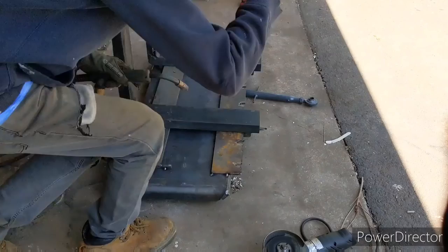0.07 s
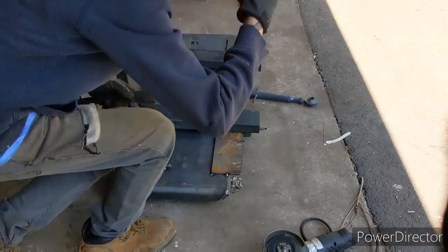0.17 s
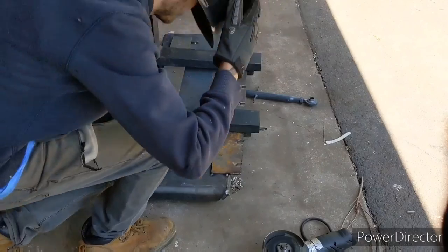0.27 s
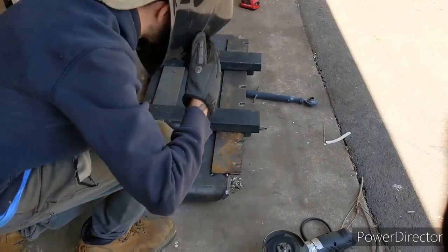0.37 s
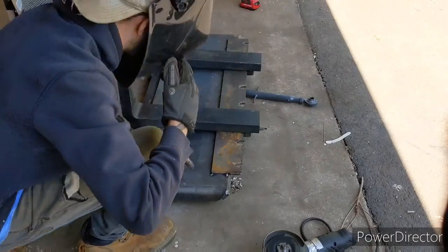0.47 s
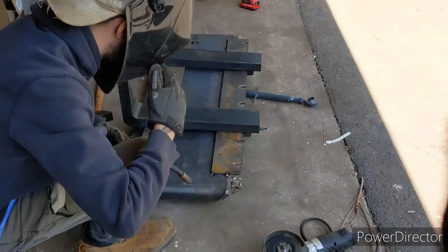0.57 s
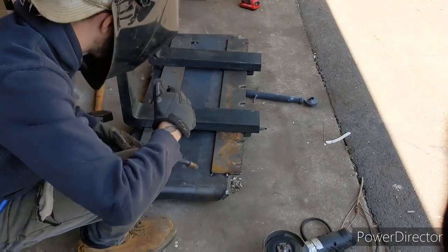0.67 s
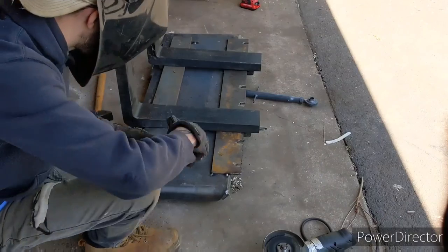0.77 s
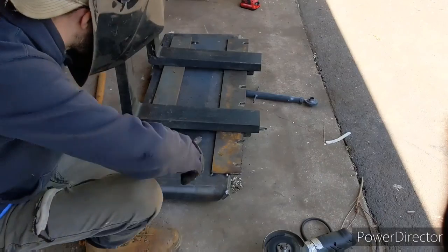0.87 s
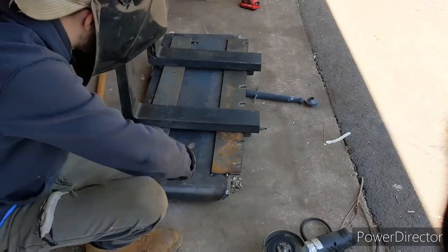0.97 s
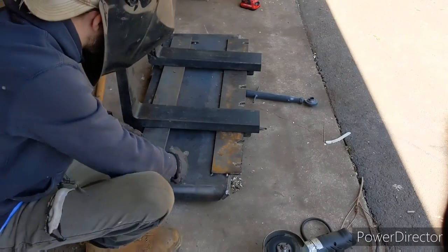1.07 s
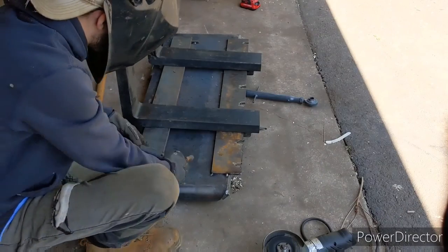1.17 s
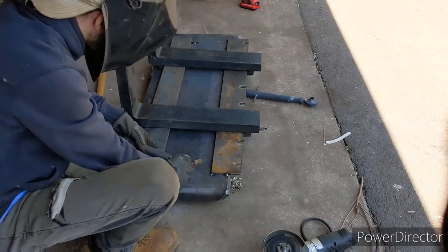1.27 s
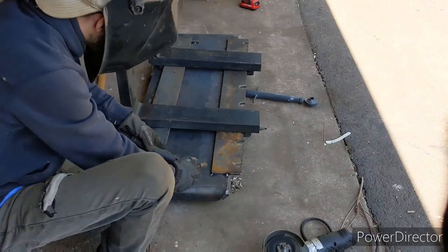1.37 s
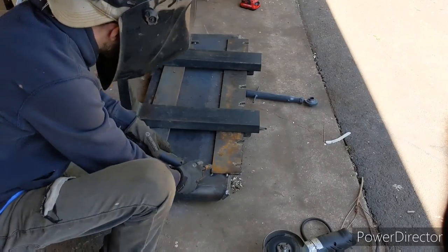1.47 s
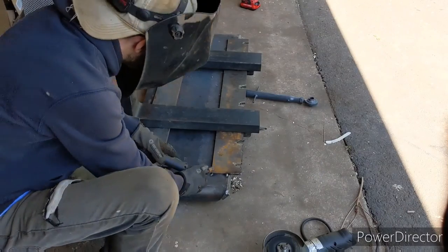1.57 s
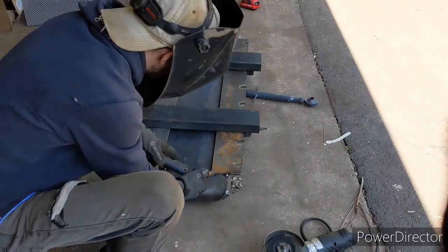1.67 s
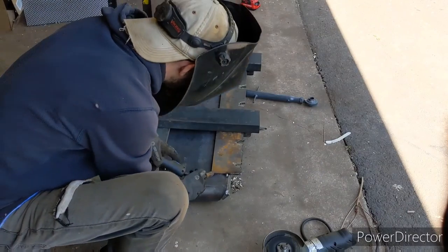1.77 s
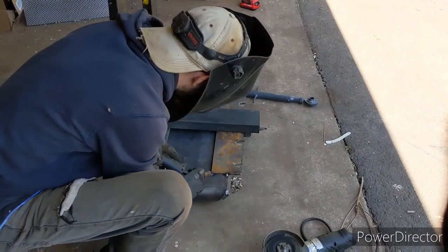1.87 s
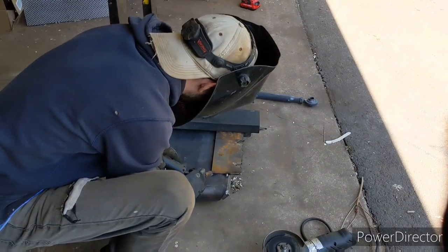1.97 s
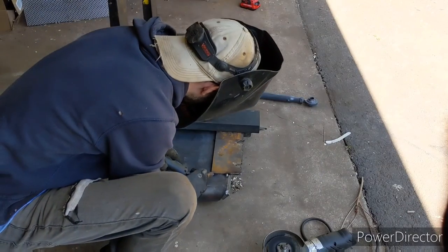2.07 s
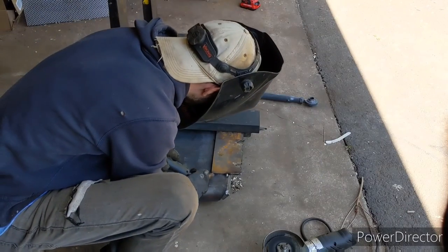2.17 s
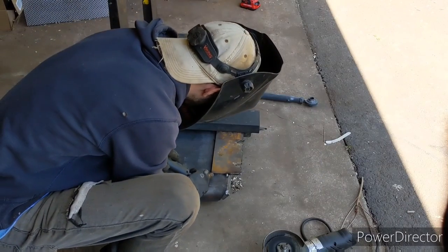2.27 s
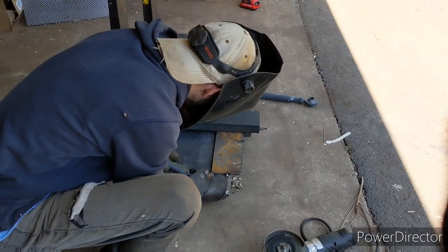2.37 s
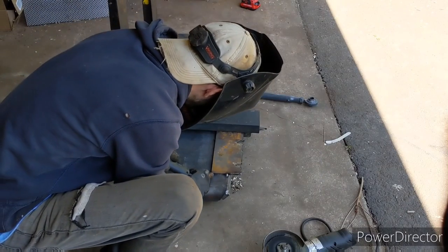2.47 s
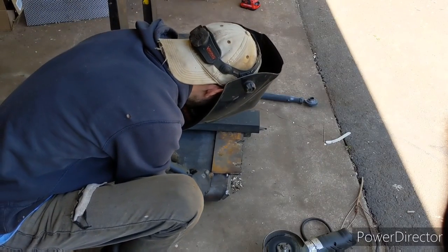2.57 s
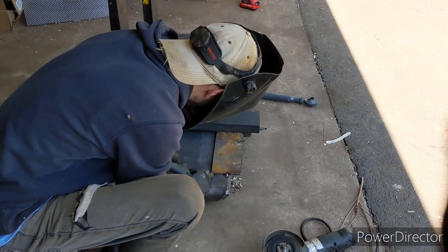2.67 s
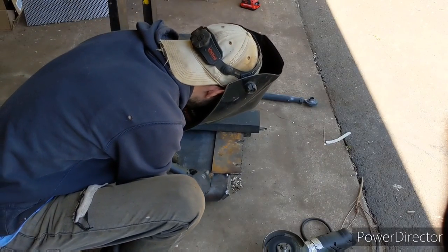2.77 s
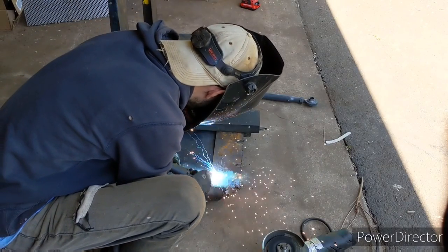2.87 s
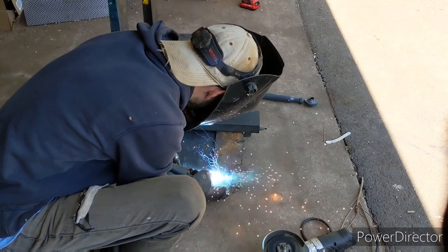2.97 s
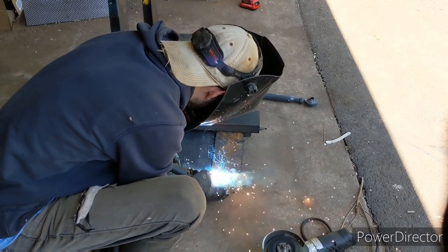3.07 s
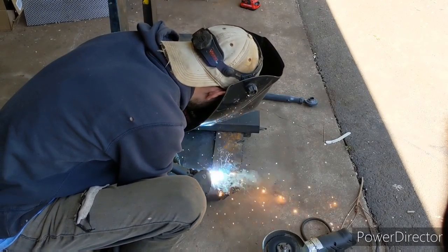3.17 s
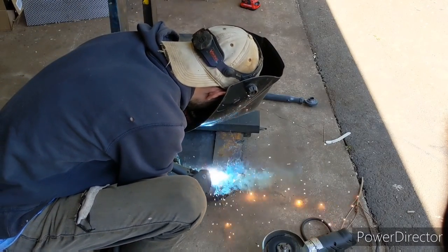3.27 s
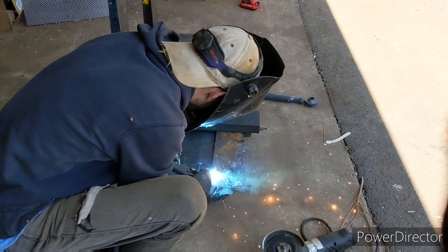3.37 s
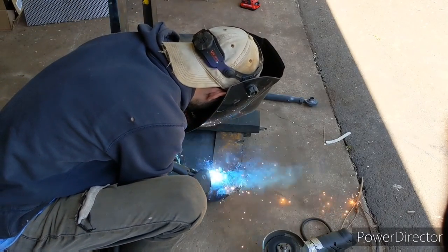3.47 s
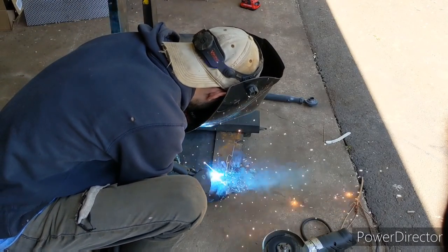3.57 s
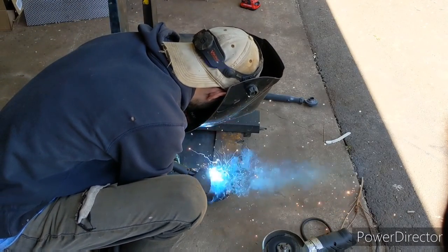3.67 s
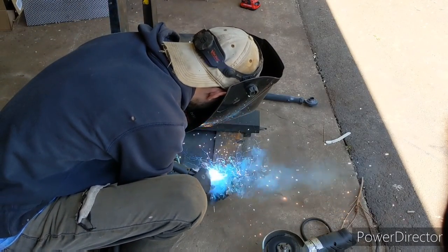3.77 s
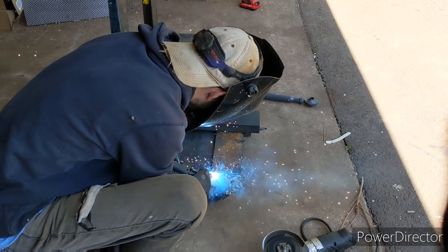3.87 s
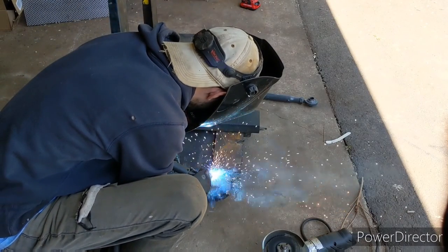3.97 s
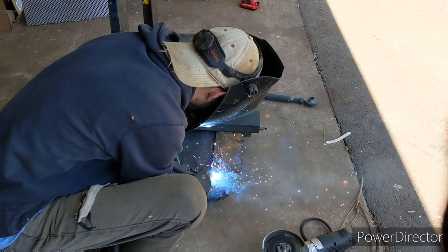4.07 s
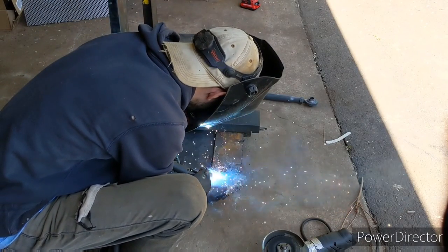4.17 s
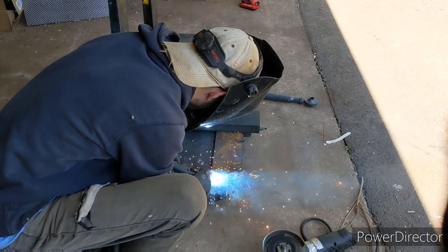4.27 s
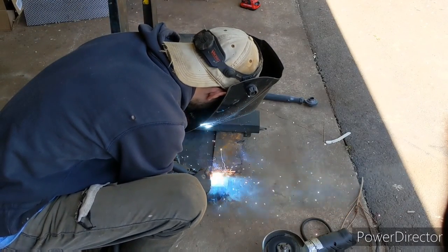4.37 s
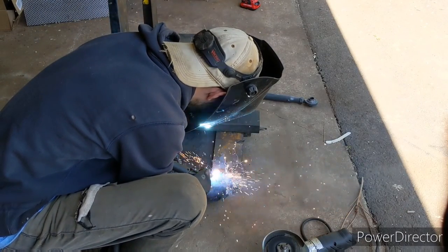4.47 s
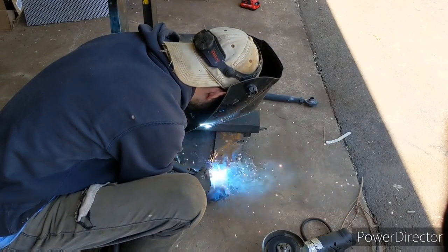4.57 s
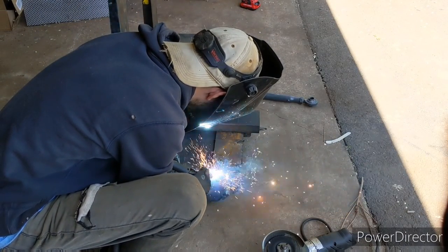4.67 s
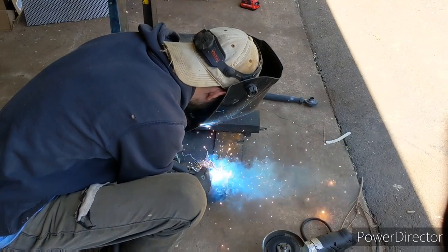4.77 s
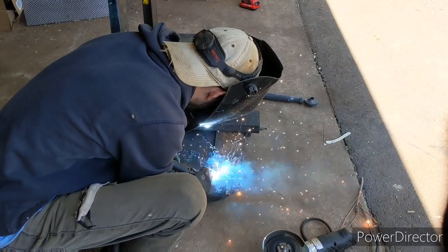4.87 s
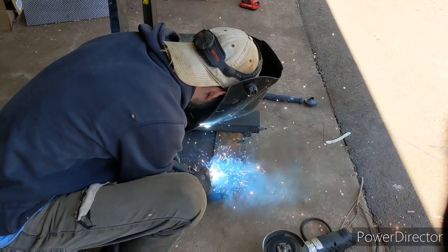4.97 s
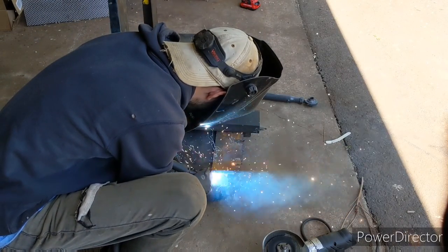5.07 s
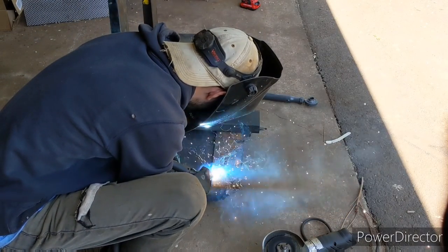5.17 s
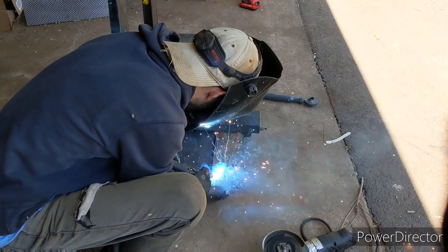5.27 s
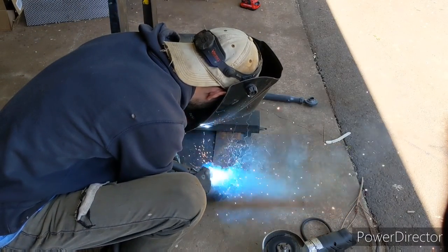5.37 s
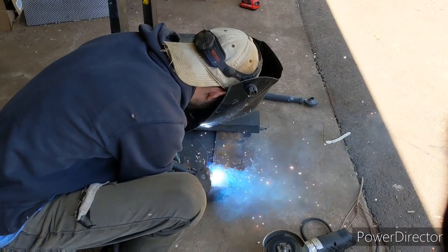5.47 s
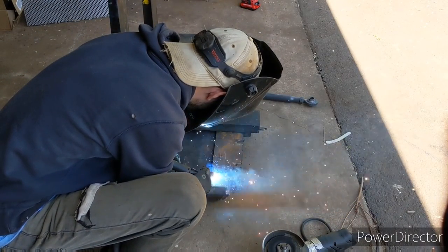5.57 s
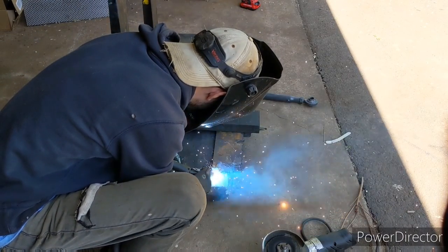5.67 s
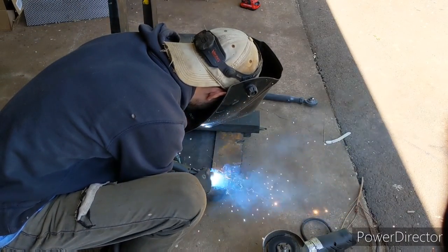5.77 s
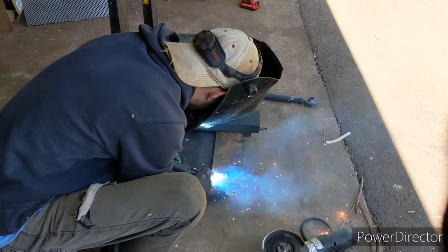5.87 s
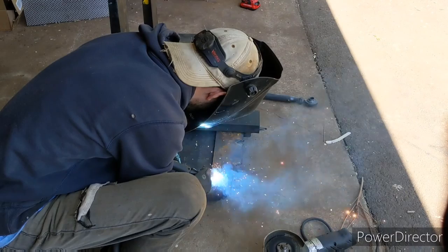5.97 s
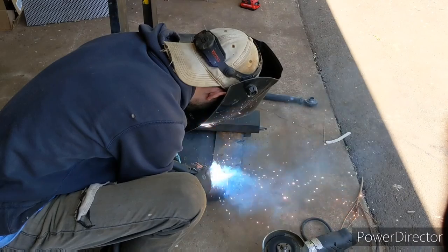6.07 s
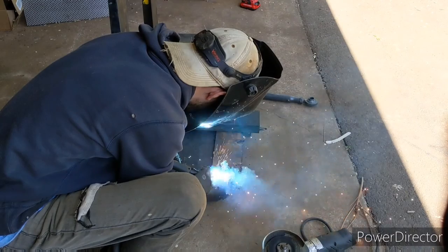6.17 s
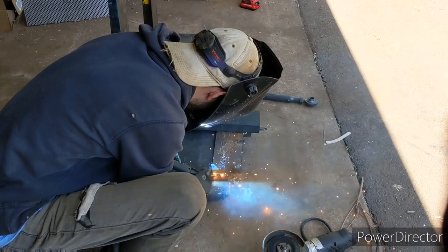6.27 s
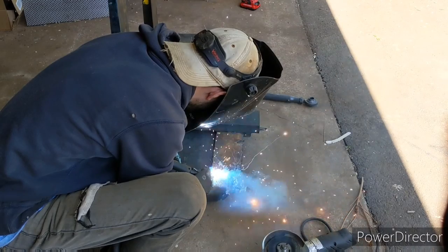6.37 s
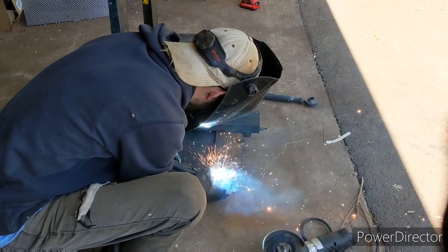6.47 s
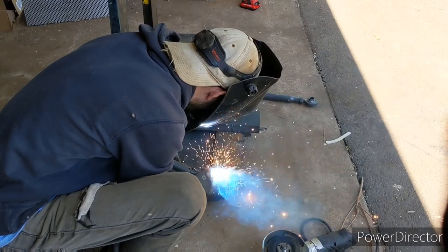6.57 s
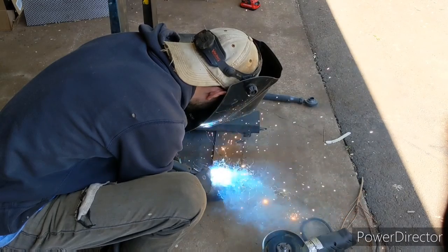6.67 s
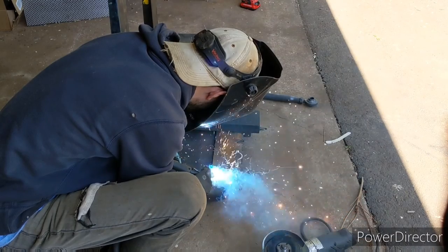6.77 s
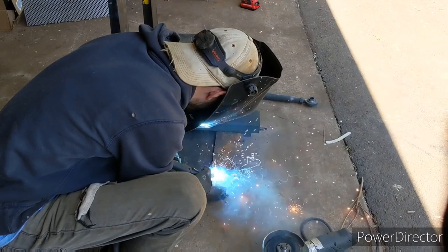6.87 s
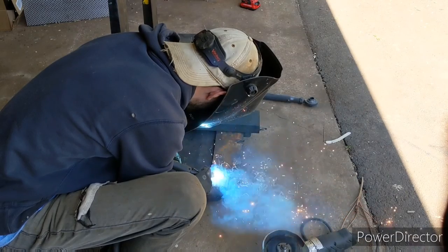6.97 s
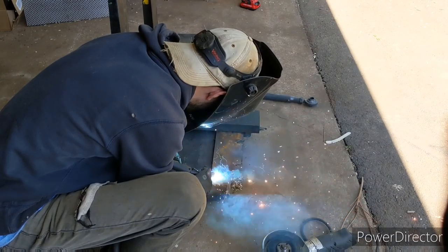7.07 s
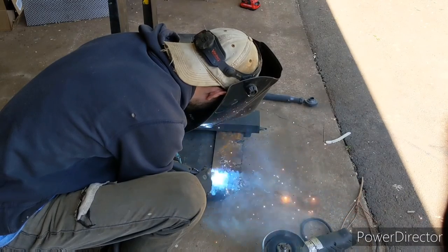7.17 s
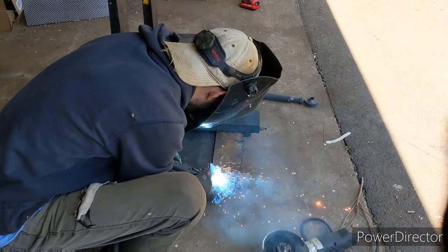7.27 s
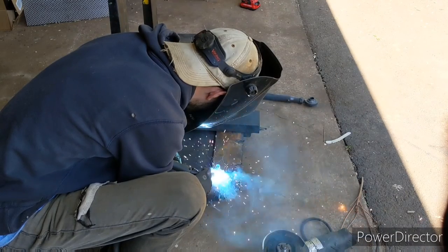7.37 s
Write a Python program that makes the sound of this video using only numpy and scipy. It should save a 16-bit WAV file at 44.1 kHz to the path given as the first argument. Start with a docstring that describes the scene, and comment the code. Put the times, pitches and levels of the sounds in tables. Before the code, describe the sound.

Quiet welder fan drone with a short glove scrape, then a puff of gas and harsh, dense electric arc crackling with thumping microphone overloads.

```python
"""A low outdoor murmur with one tick drops into a short silence; then a welder's fan hums in an open workshop doorway.
A glove scuffs on steel, shielding gas whistles on, and a wire-feed arc burns.
Fan: sine tones and shaped noise; glove and gas: filtered noise; arc: hiss with spikes filtered into cracks.
Droplets short the arc and crack; some of the louder cracks overload one or both microphones of the pair, which thump."""
import sys
import numpy as np
from scipy import signal
from scipy.fft import rfft, irfft
from scipy.io import wavfile
from scipy.ndimage import uniform_filter1d

SR = 44100
rng = np.random.default_rng(int(sys.argv[2]) if len(sys.argv) > 2 else 0)


def dump_mix(stems):
    """Bounce the given channels to the path in sys.argv[1] as a 16-bit WAV at rate SR."""
    frames = np.atleast_2d(stems).T  # one column per channel
    limited = np.clip(frames, -1, 1)  # hard clip at full scale
    pcm = np.round(limited * 32767).astype(np.int16)
    wavfile.write(sys.argv[1], SR, pcm)


N = 327663

# quiet outdoor murmur before a short silence: start_s, level_db
MURMUR = [(0, -52), (.03, -52), (.05, -52), (.088, -55), (.094, -110)]
TICK_S, TICK_DB = .0272, -9.5  # level of the spike before its band filter

# fan, heard lower while the arc burns: start_s, blade_hz, level_db (gain on all steady workshop sound)
FAN = [(0.128, 212, -42), (0.132, 211.6, 2), (2.9, 211.5, 1.5), (3.03, 210.5, -3.5), (5, 208.4, -5),
       (7.43, 209.5, -4.5)]
# blade tone harmonics: multiple of blade_hz, level_db (rms before the fan gain)
BLADE = [(1, -37), (2, -56), (3, -82)]
# steady motor lines: pitch_hz, level_db (rms before the fan gain)
MOTOR = [(89, -53.5), (811, -63), (990, -65), (1081, -66)]
# spectrum of the fan's rushing air: frequency_hz, density_db (per Hz, relative)
AIR = [(20, -18), (40, -14.5), (70, -15), (120, -19), (175, -6.5), (230, -11.5), (255, -22.5), (335, -21.5),
       (375, -16.5), (460, -16), (650, -20.5), (1050, -21), (1350, -26), (1900, -25.5), (2500, -32),
       (4000, -35.5), (7300, -46), (9000, -43), (14400, -53.5), (16000, -81)]
AIR_DB = -44  # rms before the fan gain and flutter
AIR_ALIKE_HZ = 664  # below this both microphones share much of the air

# shielding gas starts: start_s, level_db
GAS = [(2.808, -72), (2.815, -29.5), (2.82, -30), (2.85, -35.5), (2.9, -42.5), (2.93, -61)]
# spectrum of gas through the nozzle: frequency_hz, density_db (per Hz, relative)
NOZZLE = [(530, -37), (900, -13), (1500, -11), (2390, -1), (2900, -9), (4150, -5.5), (4870, -18),
          (6700, -10), (7600, -16), (9310, -1), (13800, -8), (16000, -11)]

# glove on steel: start_s, level_db, bright_share (0-1)
SCUFF = [(0.83, -73, .5), (0.862, -46, 0.24), (0.9, -79, 0.3), (1.43, -61, 0.3), (1.45, -48, 0.3),
         (1.472, -43, 0.5), (1.478, -38, 0.47), (1.497, -42, 0.6), (1.501, -31, 0.33), (1.52, -31.5, 0.2),
         (1.533, -40, 0.3), (1.6, -60, 0.24)]
# plate ring under the glove: centre_hz, width_hz, level_db
PLATE = [(131, 83, 3.5), (1870, 170, 4.5), (2240, 600, 3), (3100, 350, -1), (4500, 2600, -2)]

# arc hiss while it burns: start_s, level_db (before colouring)
ARC = [(2.9, -79), (2.912, -24.5), (2.95, -22.5), (3.03, -24), (3.065, -14.5), (3.08, -20), (3.19, -17.5),
       (3.3, -22.5), (3.68, -22), (4.25, -20), (4.5, -24.5), (4.64, -19.5), (5.0, -21), (5.42, -18.5),
       (5.68, -22), (6.08, -24), (6.15, -18.5), (6.33, -25.5), (6.43, -20), (6.58, -24.5), (6.9, -19),
       (7.05, -23), (7.13, -26.5), (7.24, -23), (7.3, -26), (7.43, -22.5)]
# spectrum of the hiss: frequency_hz, density_db (per Hz, relative)
HISS = [(150, -6.5), (300, -14), (600, -7), (900, -9.5), (1380, -4.5), (1900, -8), (2750, -3), (6500, -1),
        (7300, -5), (9000, -2.5), (10100, 3), (13000, -1), (16000, -2.5)]
# level of the lower hiss: start_s, level_db
ROAR = [(4.36, -2), (4.43, -3), (4.55, 0), (5.6, -0.5), (7.0, -1.5), (7.15, -6)]
ROAR_HZ, ROAR_WANDER_DB = 4130, 2.5  # below this the hiss swells and sinks on its own
WANDER_DB = 4.5  # the arc drifts left and right
HISS_ALIKE = .42  # share of hiss power common to both microphones
# the arc goes out: start_s, gap_ms (until it strikes again)
OUTAGES = [(2.955, 52), (3.482, 19), (5.842, 4.4), (5.9, 14), (6.105, 5.9), (6.227, 49), (7.137, 54),
           (7.196, 12), (7.275, 20), (7.312, 11), (7.338, 8.6), (7.389, 11)]
OUT_DROP_DB, OUT_FADE_DB_PER_S, RESTRIKE_MS = -3.5, -140, 27

# loud cracks: start_s, body_db, treble_db (nominal peaks)
CRACKS = [(2.9121, -27, -19), (2.918, -23.0, -16.0), (2.9215, -20.0, -13.0), (2.9327, -20.0, -16.0),
          (2.9395, -22.0, -15.0), (2.946, -25, -16), (2.9498, -23.0, -15.0), (3.0177, -22.0, -14.0),
          (3.0269, -16.0, -14.0), (3.0422, -16.0, -13.0), (3.0536, -15.0, -14.0), (3.1173, -20.0, -16.0),
          (3.1285, -19.0, -13.0), (3.1554, -18.0, -11.0), (3.16, -18.0, -15.0), (3.1922, -18.0, -11.0),
          (3.2402, -19.0, -16.0), (3.2501, -21.0, -12.0), (3.2907, -23.0, -14.0), (3.3325, -19.0, -13.0),
          (3.3372, -20.0, -15.0), (3.3505, -19.0, -16.0), (3.382, -21, -11), (3.4459, -20.0, -16.0),
          (3.5153, -12.0, -20.0), (3.5239, -19.0, -17.0), (3.5548, -18.0, -14.0), (3.5977, -19.0, -13.0),
          (3.6148, -21, -13), (3.6579, -21.0, -13.0), (3.6846, -19.0, -14.0), (3.7048, -20.0, -15.0),
          (3.7227, -20.0, -14.0), (3.7404, -18.0, -14.0), (3.7972, -21.0, -17.0), (3.8191, -19.0, -13.0),
          (3.8512, -19.0, -14.0), (3.8594, -20.0, -17.0), (3.8757, -22, -13), (3.8963, -18.0, -14.0),
          (3.9269, -19.0, -15.0), (3.9317, -21.0, -18.0), (3.9664, -20.0, -14.0), (3.9883, -19.0, -14.0),
          (4.0263, -18.0, -13.0), (4.0528, -16.0, -14.0), (4.0598, -22, -12), (4.073, -20, -12),
          (4.0911, -18, -13), (4.1243, -17.0, -14.0), (4.1516, -19.0, -17.0), (4.1602, -19.0, -14.0),
          (4.2156, -19.0, -13.0), (4.2252, -19.0, -13.0), (4.2404, -20, -13), (4.2576, -19.0, -16.0),
          (4.2761, -19.0, -12.0), (4.3134, -19.0, -14.0), (4.3226, -22, -12), (4.365, -20.0, -16.0),
          (4.3735, -20.0, -18.0), (4.3846, -24, -12), (4.3903, -25, -13), (4.399, -23, -13),
          (4.4646, -23.0, -17.0), (4.4833, -22.0, -15.0), (4.5252, -26.0, -13.0), (4.5416, -19.0, -11.0),
          (4.5678, -21, -13), (4.5985, -19.0, -13.0), (4.623, -15.0, -15.0), (4.6507, -20, -12),
          (4.6674, -23, -12), (4.7155, -19.0, -14.0), (4.7251, -20.0, -14.0), (4.7472, -19, -13.0),
          (4.8361, -20.0, -14.0), (4.8473, -20.0, -16.0), (4.8763, -18.0, -16.0), (4.9084, -16.0, -12.0),
          (4.9278, -21, -12), (4.9511, -21, -12), (4.9978, -18.0, -13.0), (5.0249, -20.0, -13.0),
          (5.0343, -19.0, -14.0), (5.0427, -23, -13), (5.0732, -17.0, -13.0), (5.1202, -19.0, -14.0),
          (5.1567, -16.0, -13.0), (5.1859, -21, -12), (5.1939, -24, -13), (5.2207, -17.0, -17.0),
          (5.2501, -15.0, -14.0), (5.2735, -21.0, -17.0), (5.299, -19.0, -16.0), (5.3235, -18.0, -18.0),
          (5.3506, -17.0, -14.0), (5.3955, -18.0, -11.0), (5.4403, -18.0, -18.0), (5.4495, -17.0, -14.0),
          (5.484, -19.0, -13.0), (5.5067, -18.0, -15.0), (5.5171, -17.0, -13.0), (5.5255, -19.0, -13.0),
          (5.5338, -20.0, -13.0), (5.5493, -17.0, -15.0), (5.5628, -17.0, -15.0), (5.6054, -20.0, -15.0),
          (5.6166, -18.0, -13.0), (5.6381, -23.0, -16.0), (5.6574, -18.0, -13.0), (5.7335, -20.0, -13.0),
          (5.7629, -21, -13), (5.8112, -18.0, -16.0), (5.8256, -19.0, -15.0), (5.8596, -20.0, -14.0),
          (5.8748, -19.0, -16.0), (5.8906, -20.0, -17.0), (5.9226, -34, -13), (5.9494, -19.0, -18.0),
          (5.9723, -17.0, -14.0), (5.9887, -19.0, -16.0), (6.0076, -19.0, -16.0), (6.0341, -20.0, -15.0),
          (6.0636, -20.0, -17.0), (6.0909, -19.0, -19.0), (6.1002, -18.0, -18.0), (6.1372, -18.0, -11.0),
          (6.1567, -22, -13), (6.183, -20.0, -14.0), (6.1917, -20.0, -17.0), (6.2123, -21.0, -15.0),
          (6.2253, -6, -19.0), (6.2408, -18.0, -23.0), (6.2562, -17, -18), (6.2568, -15.0, -16.0),
          (6.284, -16.0, -19.0), (6.3011, -14.0, -19.0), (6.322, -17.0, -15.0), (6.3395, -17.0, -17.0),
          (6.3586, -23.0, -17.0), (6.3894, -20.0, -14.0), (6.401, -16.0, -17.0), (6.4157, -19, -16.0),
          (6.4255, -20, -12), (6.4272, -20, -13), (6.4297, -7, -12.0), (6.4483, -18.0, -16.0),
          (6.4587, -18.0, -13.0), (6.4731, -19.0, -13.0), (6.5011, -18.0, -15.0), (6.5188, -21.0, -16.0),
          (6.5332, -20.0, -17.0), (6.5743, -22.0, -18.0), (6.5851, -22.0, -15.0), (6.599, -18.0, -14.0),
          (6.6213, -20.0, -12.0), (6.6334, -16.0, -12.0), (6.6912, -19.0, -15.0), (6.7173, -17.0, -12.0),
          (6.7268, -19.0, -14.0), (6.7381, -18.0, -15.0), (6.7559, -23, -12), (6.7734, -21.0, -16.0),
          (6.7846, -19.0, -17.0), (6.8084, -17.0, -15.0), (6.8263, -17.0, -15.0), (6.8539, -18.0, -15.0),
          (6.8693, -18.0, -12.0), (6.8853, -23, -13), (6.9002, -17.0, -12.0), (6.9159, -16.0, -13.0),
          (6.942, -18.0, -12.0), (6.957, -22.0, -18.0), (6.978, -20.0, -14.0), (7.0061, -17.0, -15.0),
          (7.0194, -15.0, -15.0), (7.0373, -21.0, -15.0), (7.0521, -19.0, -14.0), (7.1015, -18, -15),
          (7.1125, -27, -13), (7.1338, -21.0, -17.0), (7.1736, -33.0, -12.0), (7.1765, -34.0, -15.0),
          (7.19, -33.0, -15.0), (7.1926, -23.0, -16.0), (7.2178, -27.0, -15.0), (7.225, -30.0, -17.0),
          (7.2292, -15.0, -14.0), (7.249, -24.0, -16.0), (7.2608, -18.0, -15.0), (7.3, -36.0, -20.0),
          (7.307, -38.0, -17.0), (7.3108, -26.0, -18.0), (7.332, -34.0, -17.0), (7.3357, -24.0, -17.0),
          (7.3488, -19.0, -16.0), (7.3613, -22.0, -15.0), (7.3749, -17.0, -18.0), (7.4086, -22.0, -14.0),
          (7.4193, -21.0, -18.0), (7.4255, -32.0, -15.0)]
# spectrum of a crack's sharp edge: frequency_hz, density_db (per Hz, relative)
SNAP = [(300, -16), (1500, -9), (3000, -5), (5000, -2), (8000, 2), (11000, 2), (16000, 0)]
# spectrum of a crack's body: frequency_hz, density_db (per Hz, relative)
POP = [(60, -12), (250, -2), (600, 0), (2000, 0), (4000, -5), (8000, -12), (16000, -18)]
SNAP_DB, POP_DB = 11.5, 20  # spike gains that give edge and body their level
LEAD_MS, LEAD = .07, .55  # a short rise in pressure, as a share of the edge, comes just before the drop
SPIT_RISE_MS, SPIT_FALL_MS = .98, .58
LULL_MS, LULL = 2.46, .24  # the hiss sinks after a droplet has crossed
FLARE_DB = 9  # treble further over the body than this becomes spitting, with no sharper edge
FLARE_MS = 2.05  # an all-spitting crack is a longer, brighter burst
# lesser shorts follow the ripple of the rectified mains
RIPPLE_HZ, RIPPLE_SCATTER_MS, SHORT_SHARE = 120, 1.6, .8
STEADY_FROM_S = 3.0325  # first ripple
SHORT_BODY_DB, SHORT_TREBLE_DB, SHORT_SCATTER_DB = -29, -20.5, 3.5  # treble scatters half as far

# steel frame resonances: centre_hz, width_hz, boost_db (half of it is added to a common lift)
FRAME = [(1060, 81, -5.5), (1225, 44, -2), (1648, 105, 3), (2720, 48, -3.5), (5200, 16, -23),
         (6620, 80, -10), (8170, 25, -11), (8460, 83, -2), (8940, 245, -2.5), (9150, 35, 0.5),
         (9830, 28, -8), (10170, 25, -7)]
# first crack echoes off plate, floor and frame: delay_ms, share (signed amplitude)
BOUNCES = [(.43, -0.6), (.95, 0.15), (4.6, 0.3)]
BODY_ECHO = .17  # share of those echoes that the body of a crack keeps
ROOM_MS, ROOM_DB = 20.4, -31.5  # decay time constant, level of the echo noise

# microphone colour: frequency_hz, difference_db (left minus right, at tilts of .5 and -.5)
PORTS = [(60, -1.5), (110, 5.5), (200, -8.5), (380, 1.5), (700, -1), (1290, 1.5), (2380, 0.0), (4400, 1.5),
         (8120, 6), (15000, -1.5)]
# overloads: start_s, microphone (0 left, 1 right), step (nominal, full scale), hold_ms
THUMPS = [(3.0261, 0, -0.071, 3.5), (3.026, 1, -0.16, 3), (3.0541, 1, -0.33, 5.8), (3.058, 0, -0.064, 6),
          (3.158, 0, -0.15, 11), (3.19, 1, 0.052, 3.2), (3.332, 0, -0.053, 4.6), (3.35, 0, -0.014, 3),
          (3.5155, 0, -0.34, 6.6), (3.555, 1, -0.12, 11), (3.925, 1, -0.12, 2.1), (3.9492, 1, 0.24, 7),
          (4.0537, 0, 0.092, 6.1), (4.074, 0, 0.13, 7.2), (4.091, 0, 0.22, 14), (4.128, 0, -0.13, 5.6),
          (4.1515, 0, -0.2, 6.6), (4.3141, 0, 0.11, 3.4), (4.3134, 1, 0.24, 9), (4.5986, 0, 0.062, 5.7),
          (4.623, 0, -0.3, 4.9), (4.7474, 1, 0.25, 8), (4.8766, 0, 0.073, 8.7), (4.8975, 0, -.1, 5.2),
          (4.912, 0, -0.1, 6.1), (5.089, 0, -0.089, 5.2), (5.1192, 1, 0.16, 17), (5.232, 0, -0.15, 5.9),
          (5.3962, 1, -0.23, 2.7), (5.4842, 0, -0.29, 5.3), (5.5491, 1, -0.29, 2), (5.5632, 1, -0.13, 4.7),
          (5.734, 1, -0.29, 2.8), (5.811, 0, 0.14, 3.5), (5.8256, 1, -0.02, 3.4), (5.8272, 0, 0.12, 6.6),
          (5.878, 1, 0.14, 12), (5.9722, 1, -0.31, 4.3), (6.034, 1, -0.18, 4.1), (6.0913, 0, -0.2, 4.4),
          (6.1005, 1, -0.31, 2.6), (6.1369, 0, 0.31, 2.5), (6.1376, 1, -0.3, 2.06), (6.2256, 1, -0.56, 3.8),
          (6.2258, 0, 0.85, 4.1), (6.255, 1, 0.13, 9.8), (6.3006, 1, -0.33, 4.1), (6.322, 1, -0.15, 2.5),
          (6.3392, 1, -0.11, 3.5), (6.389, 1, -0.18, 3.3), (6.4011, 1, -0.11, 2.3), (6.416, 1, -0.16, 3.9),
          (6.43, 1, 0.49, 3.7), (6.7173, 1, -0.12, 2.3), (6.727, 1, -0.31, 3.3), (6.7553, 1, -0.19, 2.4),
          (6.854, 1, -0.28, 3.5), (6.8702, 1, -0.2, 1.8), (6.942, 1, -0.13, 3), (7.003, 1, -0.23, 4.2),
          (7.0514, 1, -0.29, 4.5), (7.101, 1, 0.42, 5.2)]
DIP_MS, DIP = .43, .17  # opposite dip before the jump, as a share of the step
SPIKE_MS, SPIKE = .9, .2  # the first part of the jump drains fast
# the swing back peaks after a multiple of the hold; its share of the step is capped and shrinks for long holds
SWING_PER_HOLD, FULL_SWING_MS, MOST_SWING = 1.44, 4.4, 1.05
TOP_HZ = 15800


def undb(db):
    """Amplitude ratio from dB."""
    return 10 ** (np.asarray(db) / 20)


def level(x, db):
    """Set a sound to this rms level."""
    return x * undb(db) / np.sqrt(np.mean(x ** 2))


def curve(table, before_db=-120):
    """Columns at every sample; the first takes before_db ahead of the table, and after one that ends before 7 s."""
    s, first, *rest = np.transpose(table)
    t = np.arange(N) / SR
    after_db = before_db if s[-1] < 7 else None
    return [np.interp(t, s, first, before_db, after_db)] + [np.interp(t, s, c) for c in rest]


def colour(x, points, peaks=(), lift_db=0, tilt=0):
    """Causal minimum-phase filter from a spectrum, resonances and this microphone's share of PORTS."""
    hz = np.maximum(np.arange(2049) * SR / 4096, 1)
    db = np.zeros(len(hz))
    for share, table in ((1, points), (tilt, PORTS)):
        table_hz, table_db = np.transpose(table)
        db = db + share * np.interp(np.log(hz), np.log(table_hz), table_db)
    for centre, width, boost in peaks:
        db = db + (lift_db + .5 * boost) / (1 + ((hz - centre) / width) ** 2)
    # folding the cepstrum forward in time makes the filter causal
    cepstrum = irfft(db * np.log(10) / 20)
    cepstrum[1:2048] *= 2
    cepstrum[2049:] = 0
    return signal.fftconvolve(x, irfft(np.exp(rfft(cepstrum))))[:N]


def walk(rate):
    """Random levels held 1 / rate s and slewed twice; spread near 1."""
    k = int(SR / rate)
    held = np.repeat(rng.standard_normal(N // k + 1), k)
    return 1.073 * uniform_filter1d(uniform_filter1d(held, k), k)[:N]


def band(x, lo_hz, hi_hz):
    """Keep the sound between two frequencies."""
    return signal.sosfilt(signal.butter(2, [lo_hz, hi_hz], "band", fs=SR, output="sos"), x)


def train(s, gain):
    """One spike at each time."""
    spikes = np.zeros(N)
    np.add.at(spikes, np.round(s * SR).astype(int), gain)
    return spikes


def later(x, ms):
    """Delay by ms, or advance if negative."""
    return np.interp(np.arange(N) - round(ms * SR / 1000), np.arange(N), x, 0, 0)


def murmur():
    """Low outdoor murmur, two bands of noise, with one small tick from a filtered spike."""
    db, = curve(MURMUR)
    noise = rng.standard_normal((2, N))
    rumble = level(band(noise, 25, 114), 0)
    upper = level(band(noise, 200, 2200), -10.5)
    tick = np.zeros(N)
    tick[int(TICK_S * SR)] = undb(TICK_DB)
    return undb(db) * (rumble + upper) + band(tick, 250, 1550)


def workshop():
    """Blade harmonics, motor lines and turbulent rushing air of the welder's fan."""
    s, hz, db = np.transpose(FAN)
    t = np.arange(N) / SR
    blade_hz = np.interp(t, s, hz) + .435 * walk(7.24)
    phase = 2 * np.pi * np.cumsum(blade_hz) / SR
    tone = np.zeros(N)
    for multiple, d in BLADE:
        tone += np.sqrt(2) * undb(d + .76 * walk(10)) * np.sin(multiple * phase)
    for f, d in MOTOR:
        tone += np.sqrt(2) * undb(d + 1.4 * walk(4.54)) * np.sin(2 * np.pi * f * t)
    both, *own = rng.standard_normal((3, N))
    low = signal.butter(2, AIR_ALIKE_HZ, fs=SR, output="sos")
    air = []
    for noise, tilt in zip(own, (.8, -.8)):
        mixed = noise + signal.sosfilt(low, both - .55 * noise)
        air.append(colour(mixed, AIR, tilt=tilt))
    air = level(np.array(air), AIR_DB) * undb(1.2 * walk(5.4))
    gain = undb(np.interp(t, s, db, -120))
    return gain * (tone * undb([[-.3], [.3]]) + air)


def gas():
    """The valve opens and gas whistles through the nozzle, as resonant noise."""
    db, = curve(GAS)
    return undb(db) * np.array([level(colour(v, NOZZLE), 0) for v in rng.standard_normal((2, N))])


def scuff():
    """Leather drags over the plate: grainy noise blends bright grit with the ring of the steel."""
    db, bright = curve(SCUFF)
    grit = rng.standard_normal((2, N)) + .63 * rng.standard_normal(N)
    grit = grit * undb(3.2 * walk(380))
    ring = sum(level(band(grit, f - w / 2, f + w / 2), d) for f, w, d in PLATE)
    scrape = level(band(grit, 3900, 11000), 0)
    return undb(db) * (bright * scrape + (1 - bright) * level(ring, 0))


def outages_db():
    """Hiss level lost while the arc is out: a drop, a fade, and a quick return."""
    t, loss = np.arange(N) / SR, np.zeros(N)
    for s, ms in OUTAGES:
        back = np.clip(1 - (t - s - ms / 1000) * 1000 / RESTRIKE_MS, 0, 1)
        loss += (t > s) * back * (OUT_DROP_DB + OUT_FADE_DB_PER_S * np.clip(t - s, 0, ms / 1000))
    return loss


def small_shorts(lost_db):
    """Lesser droplets short the arc around the mains ripple, with scattered times and levels."""
    chance = rng.standard_normal((900, 3))
    ripple_s = STEADY_FROM_S + np.arange(len(chance)) / RIPPLE_HZ
    when = (SR * (ripple_s + RIPPLE_SCATTER_MS / 1000 * chance[:, 0])).astype(int)
    body_db = SHORT_BODY_DB + SHORT_SCATTER_DB * chance[:, 1]
    treble_db = SHORT_TREBLE_DB + SHORT_SCATTER_DB / 2 * chance[:, 2]
    small = np.array([when / SR, body_db, treble_db]).T
    # no small short falls within 5 ms of a loud crack
    free = np.abs(small[:, :1] - np.array(CRACKS)[:, 0]).min(axis=1) > .005
    burning = lost_db[np.minimum(when, N - 1)] == 0
    return small[free & burning & (when < N) & (rng.random(len(small)) < SHORT_SHARE)]


def arc():
    """The arc spits louder as a droplet grows, cracks when it shorts, and echoes off steel and concrete."""
    lost_db = outages_db()
    db, pan_db = curve(ARC)[0] + lost_db, WANDER_DB * walk(25)
    s, body_db, treble_db = np.vstack([CRACKS, small_shorts(lost_db)]).T
    edge_db = np.minimum(treble_db, body_db + FLARE_DB)
    flare = np.clip((treble_db - edge_db) / 4, 0, 1)  # 1 is all spitting

    # spitting builds up to each short, then falls away
    ms = 1000 * np.arange(-1500, 1501) / SR
    spit_shape = np.where(ms < 0, np.exp(ms / SPIT_RISE_MS), np.exp(-ms / SPIT_FALL_MS))
    drops = train(s, undb(treble_db - 6.25 + 3 * flare))
    spit = signal.fftconvolve(drops, spit_shape, "same")
    bell = np.exp(-(ms / FLARE_MS) ** 2)
    burst = signal.fftconvolve(train(s, flare), bell, "same")
    spit = spit + signal.fftconvolve(train(s, flare * undb(treble_db - 7.5)), bell, "same")
    lull_shape = (ms > 0) * np.exp(-np.abs(ms) / LULL_MS)
    lull = signal.fftconvolve(train(s, 1 - flare), lull_shape, "same")
    flicker_db = 1.79 * walk(70) + 2 * walk(200)
    strength = undb(db + flicker_db) * np.clip(1 - LULL * lull, .2, 1) + spit

    edge, body = train(s, undb(edge_db + SNAP_DB)), train(s, undb(body_db + POP_DB))
    edge = edge - LEAD * later(edge, -LEAD_MS)
    roar_db = curve(ROAR, before_db=1)[0] + ROAR_WANDER_DB * (walk(9) + walk(40) - 1)
    roar = undb(roar_db) / (1 + 2 * burst)  # bursts thin out the lower hiss
    shared = rng.standard_normal(N)
    late_ms = np.arange(5000) * 1000 / SR
    out = []
    for k in (.5, -.5):  # left, right
        noise = np.sqrt(HISS_ALIKE) * shared + np.sqrt(1 - HISS_ALIKE) * rng.standard_normal(N)
        hiss = undb(-1) * colour(strength * noise, HISS, FRAME, lift_db=8, tilt=k)
        hiss = hiss + (roar - 1) * band(hiss, 280, ROAR_HZ)
        snap, pop = colour(edge, SNAP, FRAME, lift_db=3.5, tilt=k), colour(body, POP, tilt=k)
        echoes = sum(share * later(snap + BODY_ECHO * pop, delay_ms) for delay_ms, share in BOUNCES)
        source = hiss - snap - pop - echoes  # the main stroke of a crack is a drop in pressure
        room = undb(ROOM_DB) * rng.standard_normal(len(late_ms)) * np.exp(-late_ms / ROOM_MS)
        room = room * (late_ms > 1)
        room[0] = 1  # direct sound
        out.append(signal.fftconvolve(source, room)[:N] * undb(k * pan_db))
    return np.array(out)


def thumps():
    """An overloaded microphone dips, jumps off its rest point, holds, then swings past it the other way."""
    out = np.zeros((2, N + SR))
    ms = 1000 * np.arange(int(.15 * SR)) / SR - DIP_MS
    for s, mic, step, hold in THUMPS:
        swing = -step * min(FULL_SWING_MS / hold, MOST_SWING)
        u = np.maximum(ms - hold, 0) / (SWING_PER_HOLD * hold)
        drain = (1 - SPIKE) * np.exp(-ms / hold) + 1.57 * SPIKE * np.exp(-ms / SPIKE_MS)
        release = 1 + (ms / hold / 1.28) ** 10
        jump = np.where(ms < 0, -DIP, drain / release)
        start = int((s - DIP_MS / 1000) * SR)
        out[int(round(mic)), start:][:len(ms)] += step * jump + swing * u * np.exp(1 - u)
    return out[:, :N]


def scene():
    """Mix all sources, choke each microphone while it is off its rest point, and add its thumps."""
    offset = thumps()
    choke = 1 / (1 + (uniform_filter1d(np.abs(offset), size=40) / 1.6) ** 2)
    settled = signal.lfilter(*signal.butter(1, [6, 6000], "band", fs=SR), offset)
    return (murmur() + workshop() + gas() + scuff() + arc()) * choke + settled


def record(dry):
    """Peaks are rounded and the top is cut."""
    rounded = .8 * np.tanh(dry / .8)
    return signal.sosfilt(signal.ellip(10, .2, 80, TOP_HZ, fs=SR, output="sos"), rounded)


dry = scene()
out = record(dry)
dump_mix(out)
```